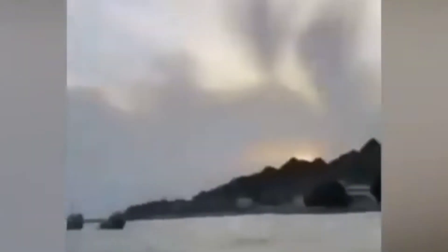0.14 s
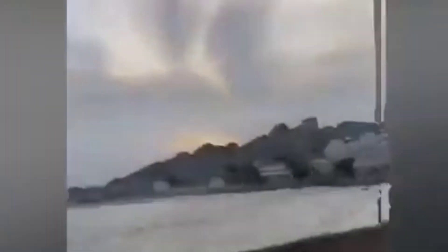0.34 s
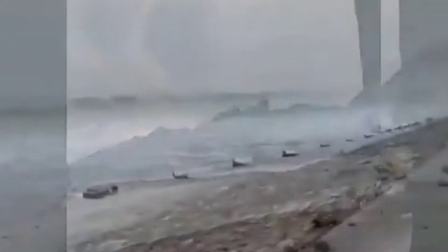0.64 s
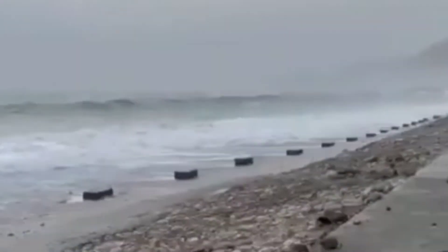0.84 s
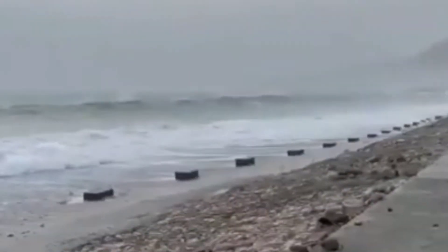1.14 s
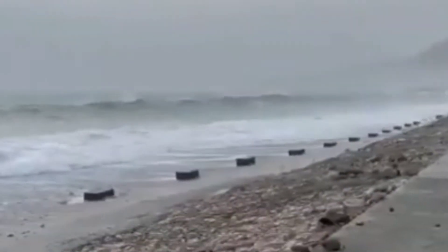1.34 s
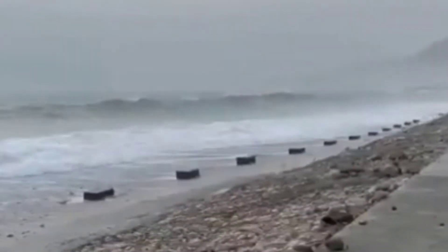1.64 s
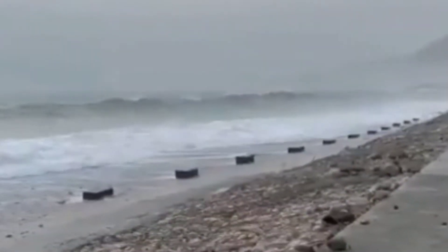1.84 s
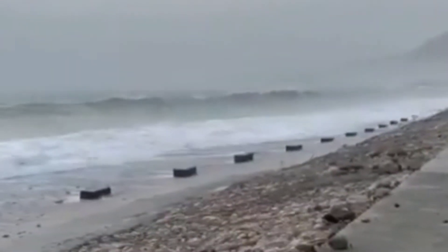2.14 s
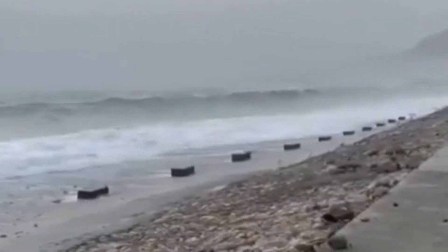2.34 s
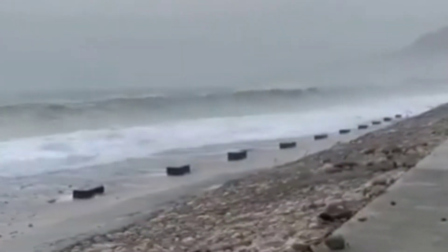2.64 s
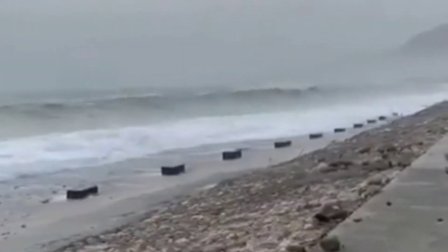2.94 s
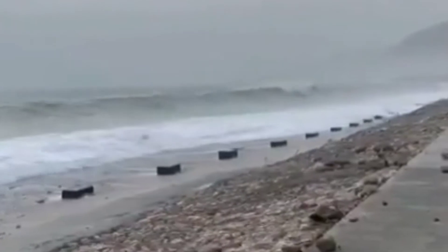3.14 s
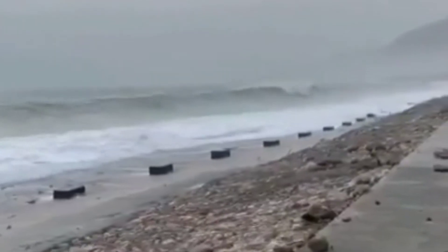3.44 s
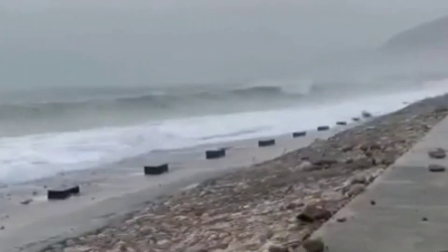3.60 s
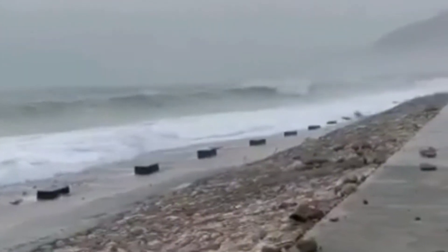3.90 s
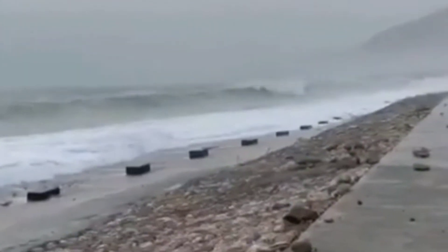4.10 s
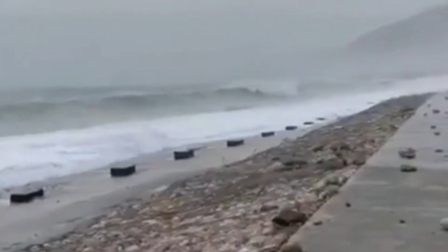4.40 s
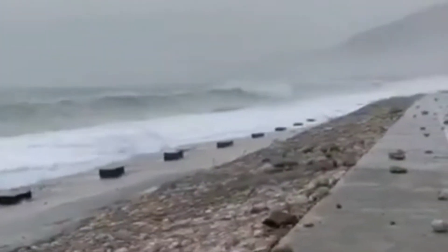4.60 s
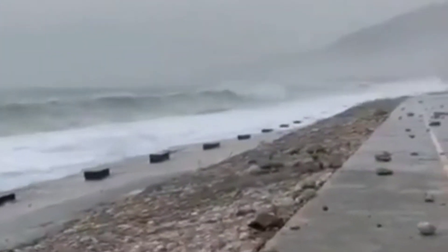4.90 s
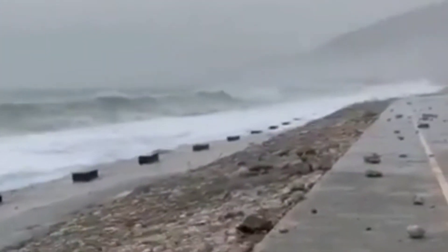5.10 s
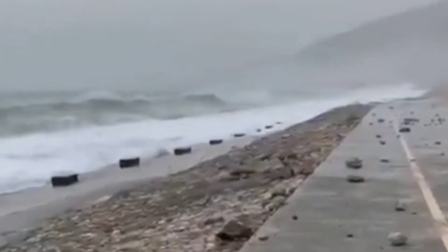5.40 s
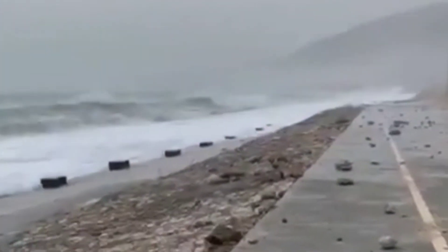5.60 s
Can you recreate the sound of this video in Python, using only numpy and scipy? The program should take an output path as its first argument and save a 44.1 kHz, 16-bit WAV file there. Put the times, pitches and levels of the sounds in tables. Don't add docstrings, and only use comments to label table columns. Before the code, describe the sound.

From 0 to 0.55 s a wave runs out close by: a centred watery roar under a bright, wide hiss of spray and mist, strongest near 0.3 s, with fine puffs and a few soft low wind touches. At 0.56 s a sharp click cuts it off, leaving about 0.15 s of silence. At 0.71 s a windy far shore starts abruptly, centred and mono. Heavy low gusts rumble, flutter and slap on the bare microphone, strongest and most crowded from 0.75 to 2.1 s, slightly saturated. After a lull around 2.3 s, separate buffets come at 2.6-3.1 s, lighter flicks near 4 s, and a strong fluttering gust at 4.8 s, then short weaker puffs to about 5.7 s. Behind, distant breakers make a thin, dull, steady rush with faint foam hiss, slowly fading, its narrow bands flickering out like poor compression. Small splashes appear near 1, 1.9 and 5.6 s.

```python
import sys
import numpy as np
from scipy import signal
from scipy.fft import rfft, irfft, next_fast_len
from scipy.io import wavfile
from scipy.ndimage import uniform_filter1d, map_coordinates

SR = 44100
rng = np.random.default_rng(int(sys.argv[2]) if len(sys.argv) > 2 else 0)


def master_out(mix):
    frames = np.transpose(np.atleast_2d(mix))
    ceiling = np.clip(frames, -1, 1)
    pcm = np.round(ceiling * 32767).astype(np.int16)
    wavfile.write(sys.argv[1], SR, pcm)


def to_linear_factor(level_db):
    exponent = np.asarray(level_db, float) / 20
    return 10 ** exponent


N = 253575
CUT_S, RESUME_S = .556, .711


def wash():
    # time_s, level_db
    wave_points = [
        (0, -22.5),
        (.08, -21.5),
        (.2, -20.5),
        (.3, -19.5),
        (.4, -20),
        (.55, -22.5),
    ]
    # pitch_hz, level_db (per Hz)
    roar_colour = [(15, -44.5), (25, -25.5), (54, -3.5), (119, -3), (347, -6.5), (393, -5.5), (626, -7.5),
                   (849, -2.5), (1800, -16), (2340, -46), (3960, -120)]
    spray_colour = [(760, -15), (1300, -0.5), (1880, -5), (2450, -5.5), (2940, -3.5), (4730, -11.5),
                    (5500, -15), (7150, -42.5), (12100, -120)]
    mist_colour = [(2650, -31), (4500, -12), (5710, 0), (8850, -6.5), (10400, -10.5), (11800, -12.5),
                   (15400, -45.5), (22000, -120)]
    # time_s, rise_db, half_length_s
    spurts = [
        (0.047, 0, .04),
        (0.284, 2.5, .03),
        (.38, 3.5, 0.0093),
        (0.554, -5.5, .02),
    ]
    # start_s, peak_db, pitch_hz, life_cycles
    thuds = [
        (.195, -12.5, 135, 1.2),
        (0.097, -15.5, 200, .8),
        (.355, -14.5, 90, .7),
        (0.4, -22, 114, .8),
    ]

    wave_db, = curves(wave_points)
    t = np.arange(N) / SR
    spray_db = wave_db - 2.5 - 16.5 * t
    spray_db = spray_db + .5 * wobble(22.0) + bumps([.12], [1.5], [.09])
    mist_db = wave_db - 14 - 9.5 * t + bumps(*np.transpose(spurts))

    roar = to_linear_factor(wave_db + 0.98 * wobble(29.5)) * rush(roar_colour, patchy_db=0.45)
    spray = to_linear_factor(spray_db + 0.5) * wide(spray_colour, patchy_db=1.0)
    mist = to_linear_factor(mist_db + .7) * wide(mist_colour, patchy_db=2.5)
    return roar + slaps(thuds, gain_db=3.5) + spray + mist


def wide(spectrum, patchy_db):
    white = [patchy(patchy_db), patchy(patchy_db)]

    def mid_and_side(hz):
        side_share = to_linear_factor(-4) * (hz > 4290) * (hz < 11750)
        return to_linear_factor(along(spectrum, hz)) * np.array([np.ones(len(hz)), side_share])

    mid, side = filtered(white, mid_and_side)
    return np.array([mid + side, mid - side]) / np.std(mid)


def wind():
    # pitch_hz, level_db (per Hz)
    rumble_colour = [(13, -50), (25, -41), (45, -12), (68, -4), (105, 0), (145, -1), (200, -22.5),
                     (370, -120)]
    flutter_colour = [(180, -16.5), (300, -3), (413, -6.5), (503, -3), (646, -4), (1100, -21.5),
                      (1430, -37), (2420, -120)]

    rumble_db, buffet_db, flutter_db = gusting()
    lumps = wobble(28)
    cavity_noise = filtered(rng.standard_normal(N), port_cavity)
    rumble = unit(to_linear_factor(0.23 * lumps) * rush(rumble_colour, patchy_db=-0.6))
    buffet = unit(to_linear_factor(0.35 * lumps + 1.5 * wobble(45)) * cavity_noise)
    flutter = unit(to_linear_factor(0.18 * lumps + 1.0 * wobble(70)) * rush(flutter_colour, patchy_db=1.0))
    return to_linear_factor(rumble_db + 0.6) * rumble + to_linear_factor(buffet_db + 0.2) * buffet + to_linear_factor(flutter_db - 0.8) * flutter


def port_cavity(hz):
    # pitch_hz, width_hz, level_db
    resonances = [
        (200, 138, 4),
        (259, 176, -8),
    ]
    total = 0
    for centre, spread, db in resonances:
        total = total + to_linear_factor(db) * 1j * hz * spread / (centre ** 2 - hz ** 2 + 1j * hz * spread)
    return total ** 2


def gusting():
    # time_s, strength_db, big_over_small_db (big swirls over small)
    wind_points = [(.72, -25, -3), (.95, -22, -2), (1.3, -21.5, 0), (1.45, -25.5, -2.5), (1.65, -23, 4.5),
                   (2.1, -26, 3), (2.22, -28, -10.5), (2.55, -28, -3.5), (3.0, -31.5, -5), (3.4, -27, -6),
                   (3.7, -29, -5.5), (4.05, -28, -1), (4.45, -29.5, -0.5), (4.7, -29, 3), (4.85, -33.5, 5),
                   (5.1, -30.5, 8), (5.5, -34, 1.5), (5.75, -33.5, 1.5)]
    # time_s, rise_db, half_length_s, pitch_hz
    gusts = [(0.856, 11, 0.01, 232), (0.947, 13, 0.027, 127), (1.102, 3, 0.021, 150), (1.316, 8, .02, 200),
             (1.573, 4.5, 0.022, 200), (1.72, 16, 0.038, 166), (1.82, 12.5, 0.032, 145),
             (1.928, 14, 0.024, 230), (1.983, 4, .025, 85), (2.08, 12, 0.051, 136), (2.505, 6, 0.027, 170),
             (2.667, 10, 0.028, 230), (2.834, 14, 0.032, 136), (3.01, 10, 0.16, 216),
             (3.563, 7, 0.055, 187), (3.83, 4.5, 0.037, 220), (3.924, 4.5, 0.06, 85),
             (3.971, 7.5, 0.032, 520), (4.475, 9, 0.015, 120), (4.613, 10, 0.02, 280),
             (4.777, 19, 0.073, 288), (4.565, 5.5, 0.015, 200), (4.967, 4, .025, 200),
             (5.05, 5, 0.028, 240), (5.158, 9, 0.02, 220), (5.28, 10, .02, 380), (5.351, 6, 0.013, 95),
             (5.408, 10, 0.014, 170), (.76, -3, 0.017, 200), (5.648, 9, .05, 170)]
    # time_s, change_db, half_length_s
    lulls = [(0.882, -3.5, 0.01), (1.002, -4.5, 0.035), (1.218, -2.5, 0.054), (1.377, -5.5, 0.017),
             (1.643, -4.5, .025), (1.764, -4, 0.0092), (1.863, 1, 0.017), (2.33, -4, 0.052),
             (3.38, -4, 0.031), (3.623, -3.5, .02), (3.76, -1, .03), (4.452, -3, 0.015), (4.666, -3.5, .02),
             (4.836, -7.5, 0.021), (4.928, -10, 0.018), (5.093, -3, .015), (5.23, 0.5, .015),
             (5.303, -5, 0.016), (5.385, -8, 0.013), (5.208, -3, 0.014), (5.513, -5.5, 0.038),
             (5.59, -4, 0.013)]

    strength_db, big_db = curves(wind_points)
    strength_db = strength_db + bumps(*np.transpose(lulls))
    s, rise_db, half, pitch = np.transpose(gusts)

    def layer(centre_hz, own_db, lean, restless_db):
        octaves = np.log2(pitch / centre_hz)
        nearness = np.exp(-(octaves / 0.56) ** 2)
        return strength_db + lean * big_db + own_db + bumps(s, rise_db * nearness, half) + restless_db

    rumble_db = layer(95, -1, .8, 1.6 * wobble(15))
    buffet_db = layer(212, 0.5, .1, 2.4 * wobble(19))
    flutter_db = layer(520, 1, -.3, 0.68 * wobble(19))
    return rumble_db, buffet_db, flutter_db


def port_slaps():
    # start_s, peak_db, pitch_hz, life_cycles
    big_swirls = [(0.72, -9, 190, 0.7), (0.755, -3, 204, 0.7), (0.849, -10, 218, 0.55),
                  (0.903, -2, 130, 0.43), (0.938, 3, 111, 0.55), (1.109, -1.5, 221, 0.69),
                  (1.314, -0.5, 204, 0.7), (1.454, -10, 144, 0.91), (1.712, -3, 210, 0.96),
                  (1.726, -1.5, 100.7, 0.91), (1.803, -1, 191, 0.47), (1.911, 0.5, 191, 0.56),
                  (2.004, -4, 234, 0.71), (2.6, -9, 140, 0.83), (2.679, -13, 223, 0.74),
                  (2.954, -6.5, 194, 0.63), (3.04, -4, 205, 0.6), (3.449, -10, 272, 0.39),
                  (3.604, -3, 278, 0.65), (4.149, -15, 215, 0.5), (4.288, -9, 307, 0.47),
                  (4.544, -12, 215, 0.86), (4.604, -9.5, 275, 0.68), (4.864, -11.5, 136, 0.36),
                  (5.011, -15, 149, 0.74), (5.151, -12, 198, 0.6), (5.259, -11, 318, 0.91),
                  (5.352, -26, 131, 0.65), (5.403, -14, 236, 0.48), (5.54, -19, 113, 0.8)]
    small_swirls = [(0.721, -22, 413, 0.38), (1.837, -15.5, 401, 0.56), (1.94, -14, 440, 0.76),
                    (2.026, -14, 395, 0.77), (2.648, -17, 660, 0.69), (2.906, -17, 533, 0.66),
                    (3.338, -14.5, 590, 0.71), (3.952, -14, 401, 0.81), (3.965, -13, 520, 0.96),
                    (3.974, -12, 520, 1), (3.998, -14, 520, 0.85), (4.019, -15, 480, 0.81),
                    (4.189, -12.5, 554, 0.65), (4.244, -15.5, 600, 0.71), (4.285, -20, 477, 0.73),
                    (4.61, -13.5, 410, 0.52), (4.656, -23, 689, 0.92), (4.728, -12.5, 470, 0.66),
                    (4.751, -12, 410, 0.63), (4.782, -12.5, 510, 0.68), (4.947, -22, 560, 0.93),
                    (4.979, -16.5, 410, 0.54), (5.047, -15.5, 401, 0.87), (5.149, -15, 401, 0.72),
                    (5.258, -18, 468, 0.83)]
    return slaps(big_swirls, gain_db=4.0) + slaps(small_swirls, gain_db=8.5)


def slaps(events, gain_db):
    out = np.zeros(N + SR)
    t = np.arange(SR // 10) / SR
    phases = rng.uniform(0, 2 * np.pi, len(events))
    for (s, db, hz, cycles), phase in zip(events, phases):
        age = t * hz / cycles
        push = age * np.exp(-age) * np.sin(2 * np.pi * hz * t + phase)
        out[round(s * SR):][:len(t)] += to_linear_factor(db + gain_db) * push
    return out[:N]


def surf():
    # time_s, level_db
    surf_points = [(.72, -33), (1.2, -33.5), (2.1, -35), (2.9, -36), (3.25, -35.5), (3.7, -37), (5.4, -41),
                   (5.75, -41)]
    # pitch_hz, level_db (per Hz)
    breaker_colour = [(470, -14.5), (800, -2), (1370, -10.5), (2520, -13.5), (2880, -16), (3330, -21),
                      (3860, -18.5), (4600, -24.5), (5980, -31), (10100, -120)]
    foam_colour = [(3800, -39), (4600, -1), (5300, 1), (6300, 0.5), (7100, 0.5), (7800, 1), (9000, 2),
                   (10000, -1), (11200, 2.5), (12000, -11.5)]
    # time_s, rise_db, half_length_s, fineness (0 heavy water to 1 fine foam)
    splashes = [
        (0.995, 6.5, 0.0044, 0.1),
        (1.065, 4, 0.015, 0.96),
        (1.916, 5.5, 0.012, 0.7),
        (5.61, 4, 0.032, 0.6),
        (5.717, 1.5, .02, .3),
    ]

    surf_db, = curves(surf_points)
    s, rise_db, half, fine = np.transpose(splashes)
    breakers_db = surf_db + bumps(s, rise_db * (1.3 - fine), half)
    foam_db = -46 + 0.3 * (surf_db - surf_points[0][1]) + bumps(s, rise_db * (.2 + fine), half)
    swell = wobble(8.1)
    breakers = to_linear_factor(breakers_db + 4.0 + 0.29 * swell) * rush(breaker_colour, patchy_db=1.34)
    foam = to_linear_factor(foam_db + 2.5 + 0.5 * swell) * rush(foam_colour, patchy_db=0.9)
    return breakers + foam


def thinned(x):
    # time_s, factor (on the dropped share)
    dropout_points = [(.7, .4), (2.5, .95), (4.3, 1.35), (5.3, 1.5), (5.5, .9), (5.75, .8)]
    # pitch_hz, share (0-1)
    top_dropouts = [(9200, 0), (9650, .45), (10750, .97), (10950, .7), (11250, .4), (11550, .6),
                    (11750, .9)]
    # time_s, lost (0 gap filled, 1 lone high band lost)
    odd_moments = [
        (.7, 0),
        (.865, 0),
        (1.17, 1),
        (1.43, 1),
        (2.2, 1),
        (2.365, 0),
        (2.42, 1),
        (3.64, 1),
    ]
    top_hz, low_hz, high_hz = 9700, 10650, 11750

    hz, t, z = signal.stft(x, SR, "cosine", nperseg=2048)
    field = uniform_filter1d(rng.standard_normal(z.shape), size=8, axis=0)
    field = unit(uniform_filter1d(field, size=2, axis=1))
    field = field + .3 * rng.standard_normal(len(t))
    chance = 1 / (1 + np.exp(-1.7 * unit(field)))

    share = dropped_share(hz)[:, None] * np.interp(t, *np.transpose(dropout_points))
    share = share * (hz[:, None] < top_hz) + along(top_dropouts, hz)[:, None]
    lone_band = (hz > low_hz) & (hz < high_hz)
    kept = (chance > share) & ((hz < top_hz) | lone_band)[:, None]
    for s, lost in odd_moments:
        kept[(hz > top_hz) & (hz < high_hz), np.argmin(abs(t - s))] = not lost
    return signal.istft(z * kept, SR, "cosine", nperseg=2048)[1][:N]


def dropped_share(hz):
    # pitch_hz, extra_share (0-1), half_width_octaves
    weak_spots = [(1530, .09, .22), (3280, .57, .085), (4500, .19, .055), (5700, .11, .18),
                  (7200, .27, .11), (8800, .05, .2)]
    total = .055 * (hz > 1100)
    for centre, share, octaves in weak_spots:
        total = total + share * np.exp(-(np.log2((hz + 1) / centre) / octaves) ** 2)
    return total


def snip():
    since = np.arange(N) / SR - CUT_S
    click = to_linear_factor(-21.5) * np.exp(-(since * SR) ** 2)
    splatter_db = -44.5 - 60 * abs(since) / 0.03
    return click + to_linear_factor(splatter_db) * (since > 0) * rng.standard_normal((2, N))


def rush(spectrum, patchy_db):
    return unit(filtered(patchy(patchy_db), lambda hz: to_linear_factor(along(spectrum, hz))))


def patchy(patchy_db):
    z = signal.stft(rng.standard_normal(N), nperseg=512)[2]
    field = uniform_filter1d(rng.standard_normal(z.shape), size=5, axis=0)
    field = uniform_filter1d(field, size=8, axis=1)
    return signal.istft(z * to_linear_factor(patchy_db * unit(field)), nperseg=512)[1][:N]


def filtered(x, response):
    m = next_fast_len(N + 8192)
    return irfft(rfft(x, m) * response(np.fft.rfftfreq(m, 1 / SR)), m)[..., :N]


def wobble(rate):
    knots = rng.standard_normal(int(N * rate / SR) + 4)
    return map_coordinates(knots, [np.arange(N) * rate / SR])


def bumps(times, rises_db, halves):
    t = np.arange(0, N, 32) / SR
    bells = np.exp(-((t - np.c_[times]) / np.c_[halves]) ** 2)
    return np.interp(np.arange(N) / SR, t, np.asarray(rises_db) @ bells)


def curves(rows):
    s, *columns = np.transpose(rows)
    return [np.interp(np.arange(N) / SR, s, column) for column in columns]


def along(points, hz):
    f, v = np.transpose(points)
    return np.interp(np.log(hz + 1), np.log(f + 1), v)


def unit(x):
    return x / np.sqrt(np.mean(x ** 2) + 1e-20)


def scene():
    t = np.arange(N) / SR
    close = filtered(wash(), lambda hz: hz < 12100)
    port = wind() + port_slaps() + surf()
    limited = port / (1 + abs(port / 1.05) ** 6) ** (1 / 6)
    shore = thinned(limited)
    rise = np.sin(np.pi / 2 * np.clip((t - RESUME_S) / .0016, 0, 1)) ** 2
    return close * (t < CUT_S) + snip() + shore * rise


def top_cut(x):
    return signal.sosfilt(signal.butter(12, 15790, fs=SR, output="sos"), x)


def record(dry):
    return top_cut(dry)


dry = scene()
out = record(dry)
master_out(out)
```